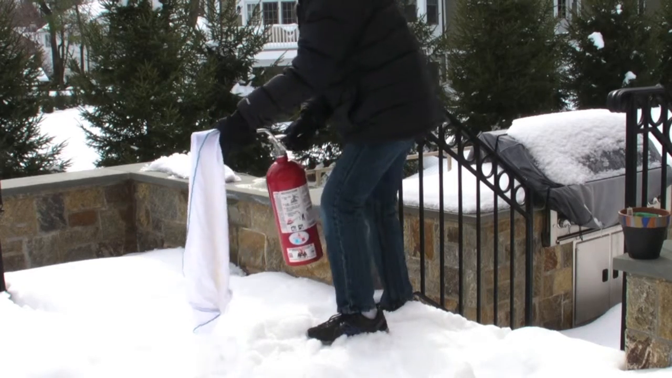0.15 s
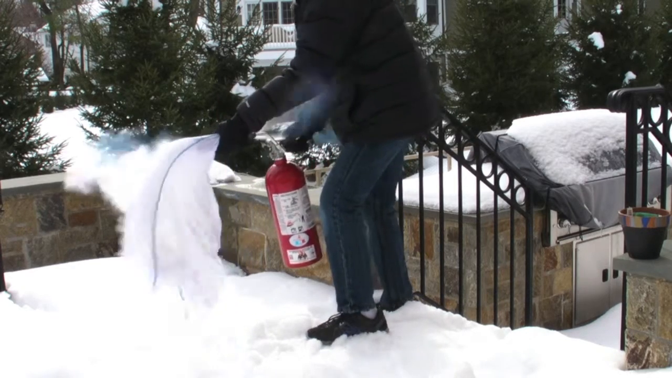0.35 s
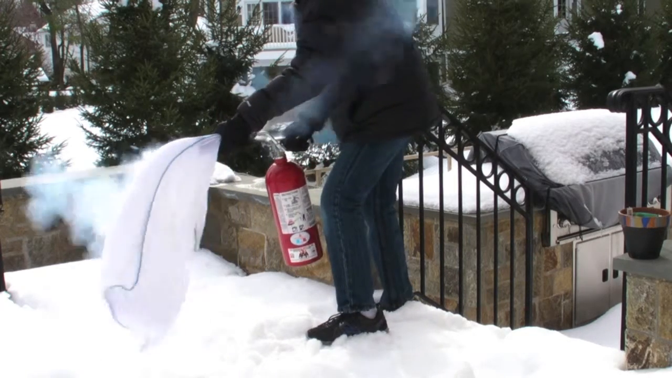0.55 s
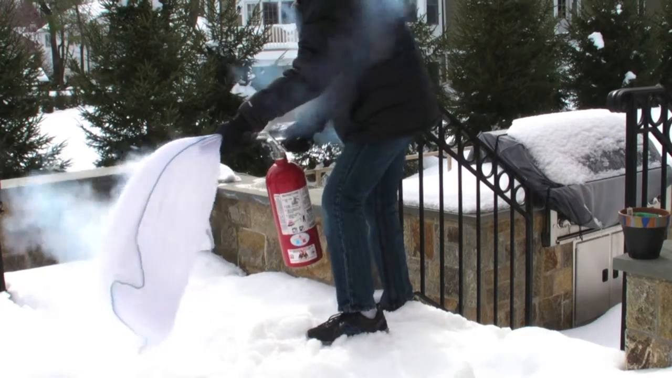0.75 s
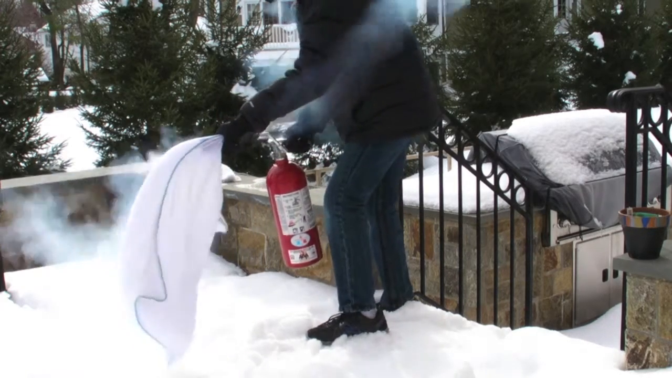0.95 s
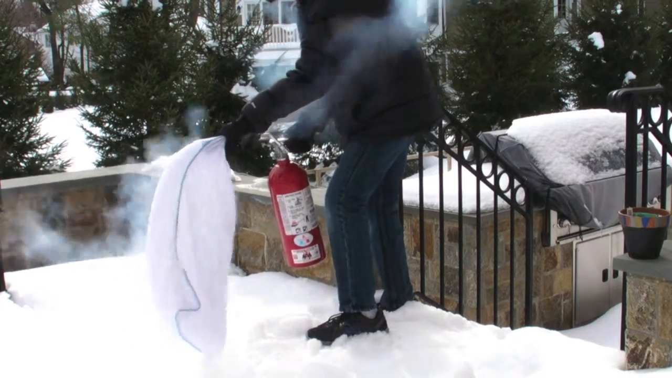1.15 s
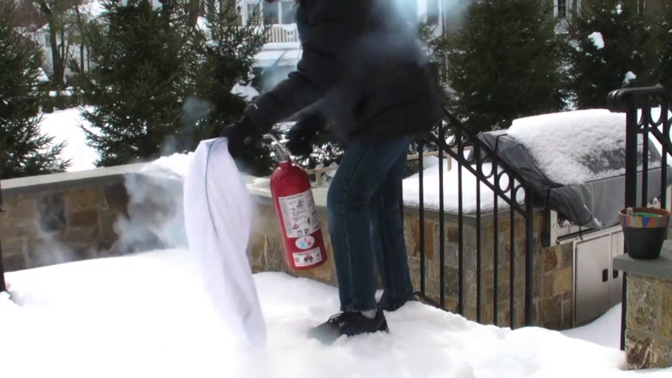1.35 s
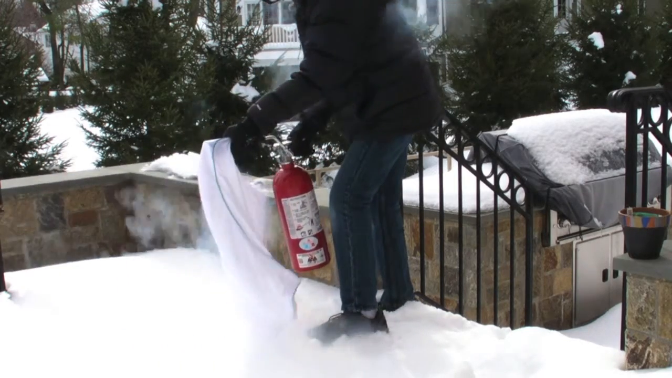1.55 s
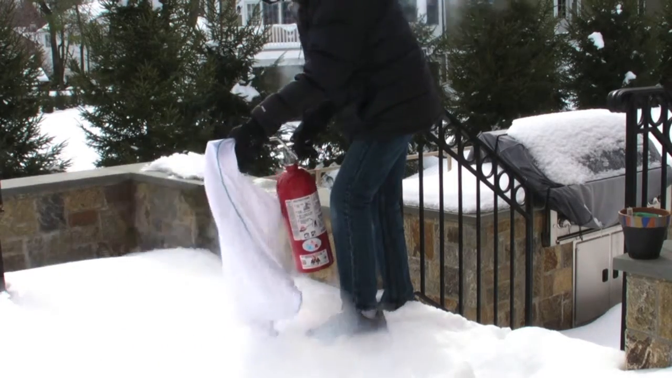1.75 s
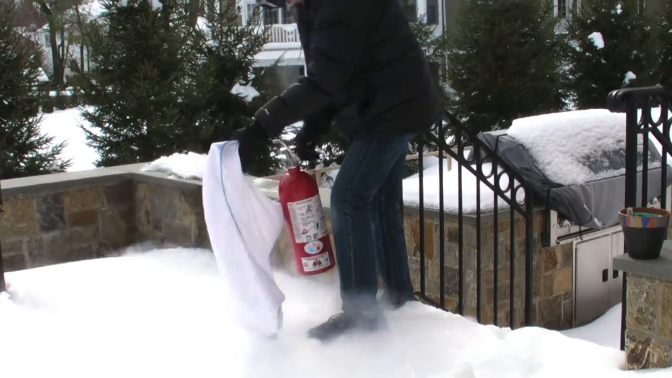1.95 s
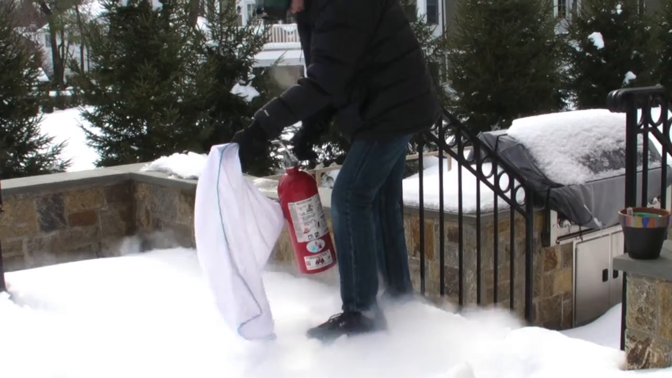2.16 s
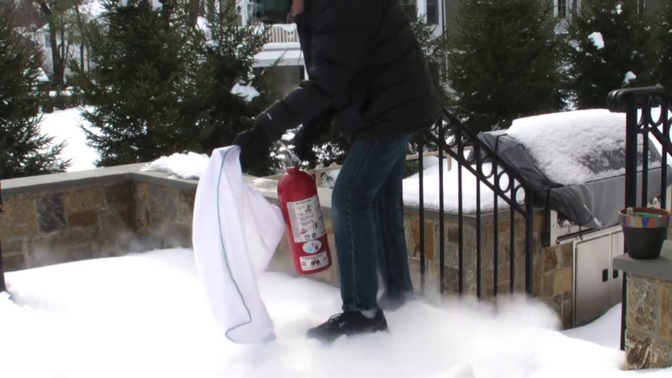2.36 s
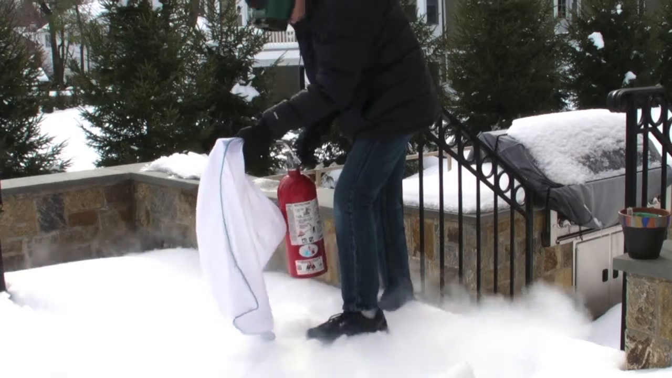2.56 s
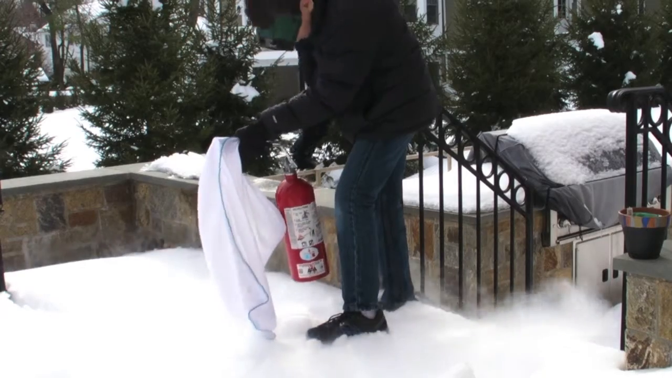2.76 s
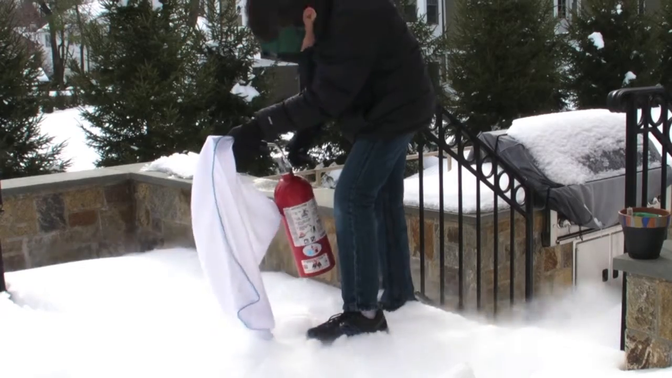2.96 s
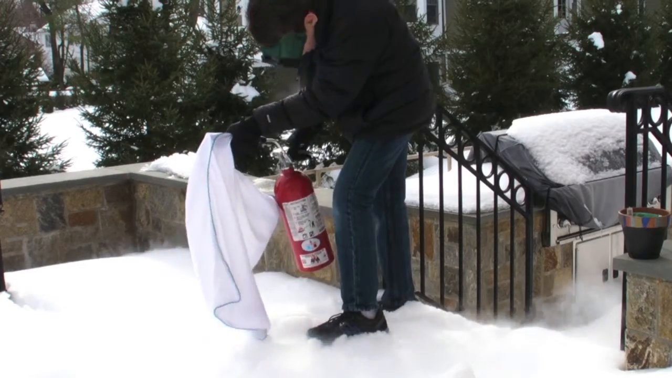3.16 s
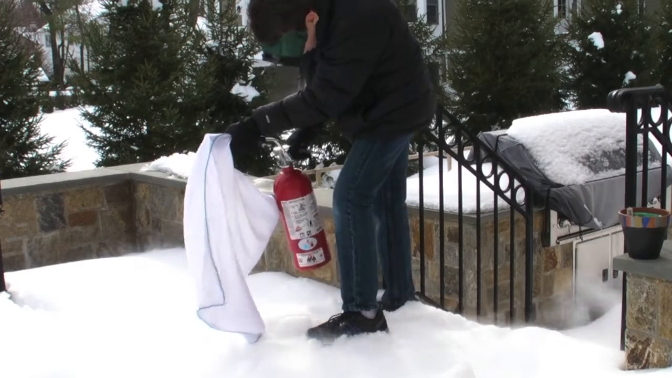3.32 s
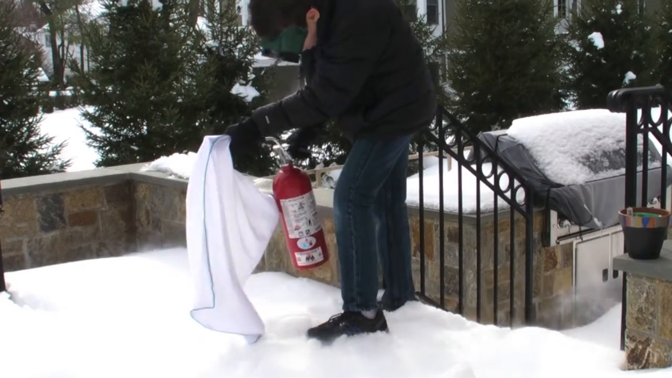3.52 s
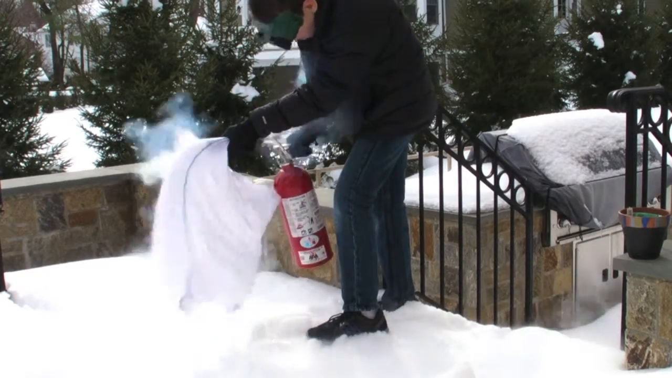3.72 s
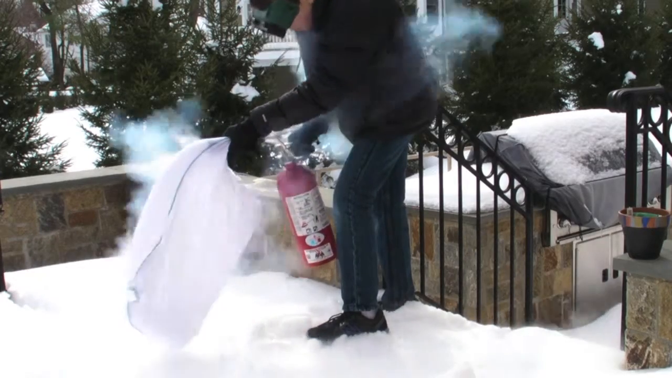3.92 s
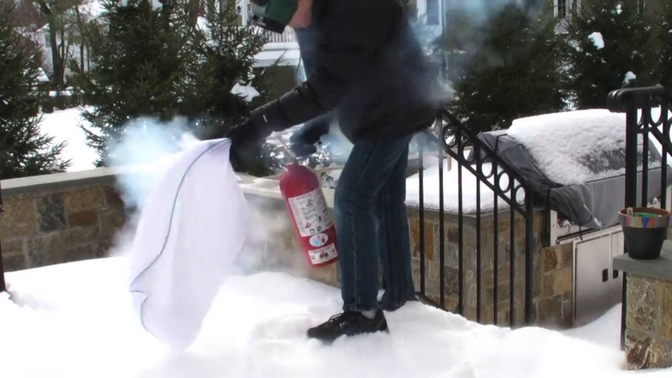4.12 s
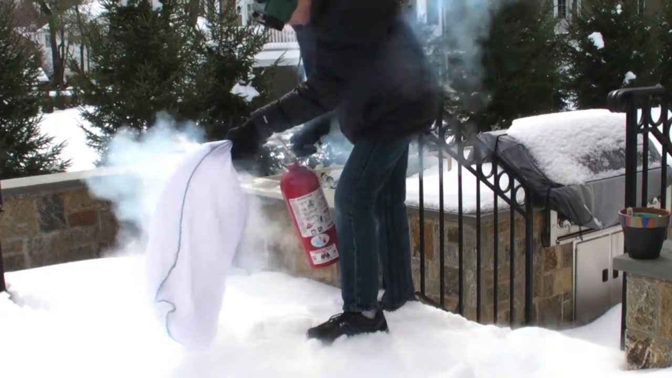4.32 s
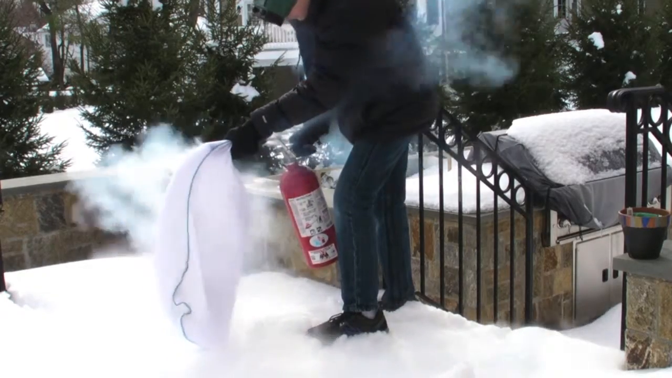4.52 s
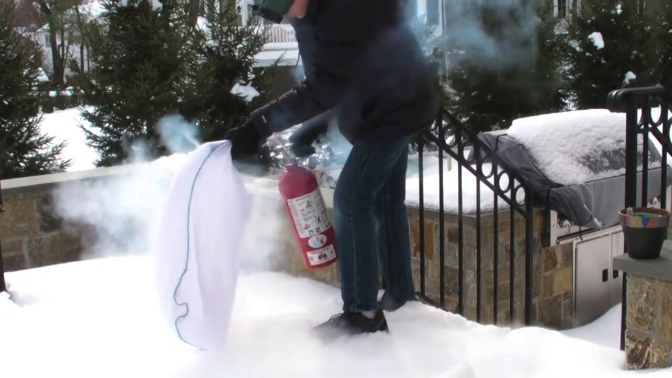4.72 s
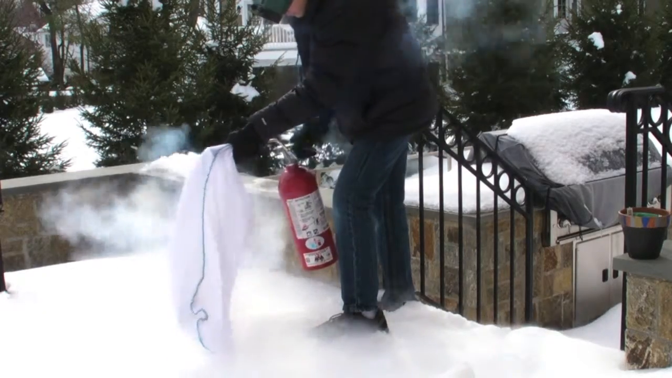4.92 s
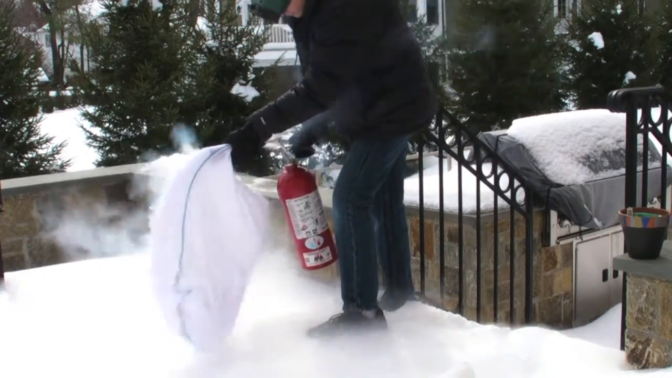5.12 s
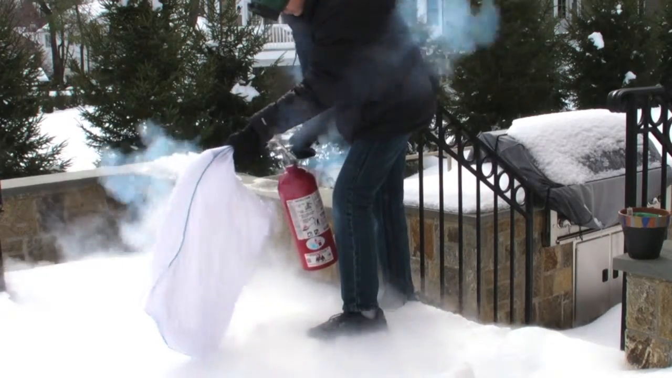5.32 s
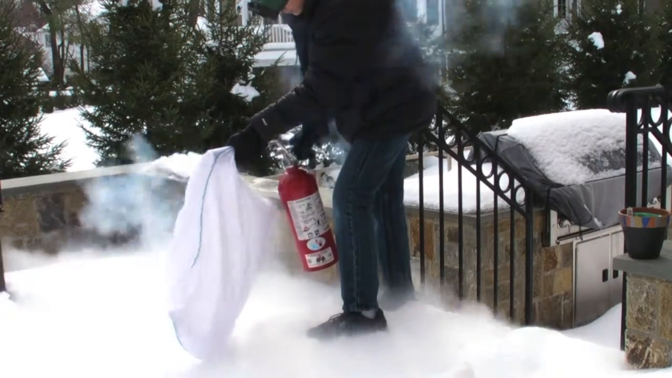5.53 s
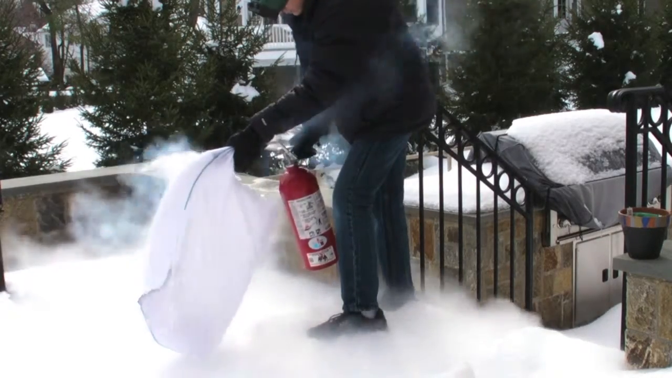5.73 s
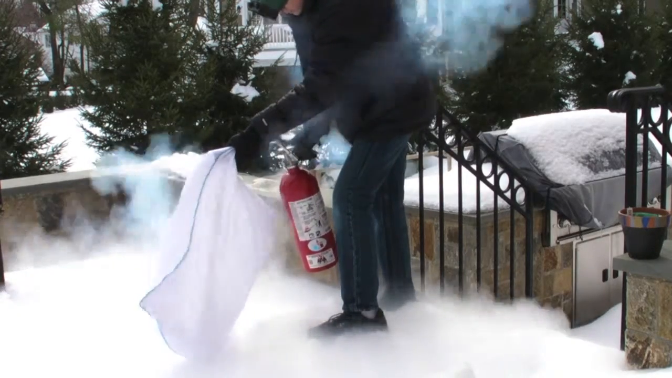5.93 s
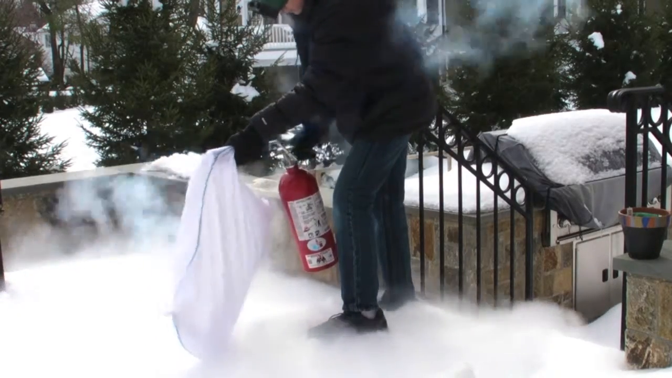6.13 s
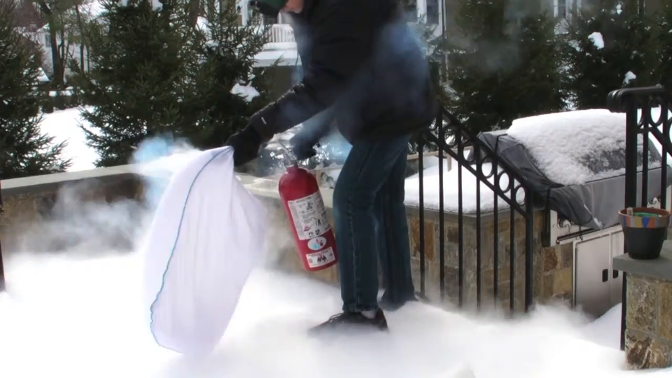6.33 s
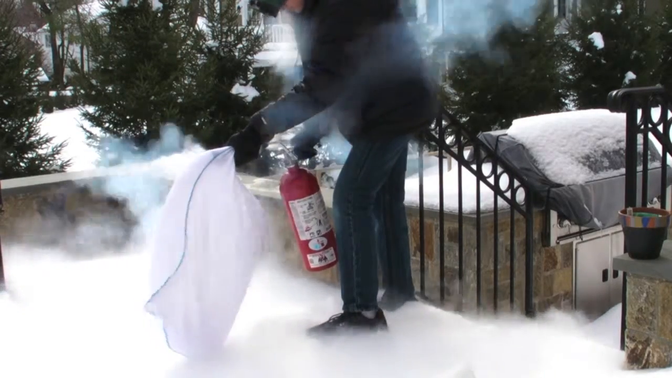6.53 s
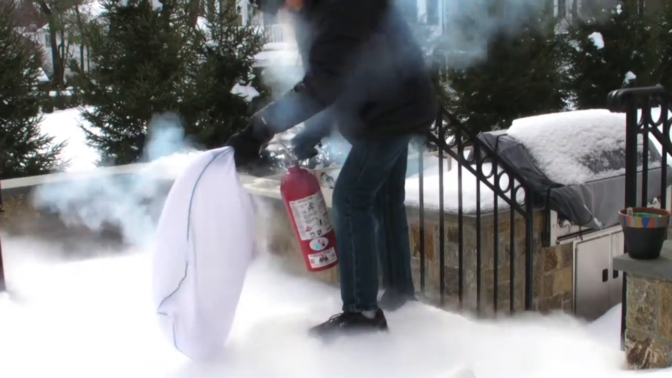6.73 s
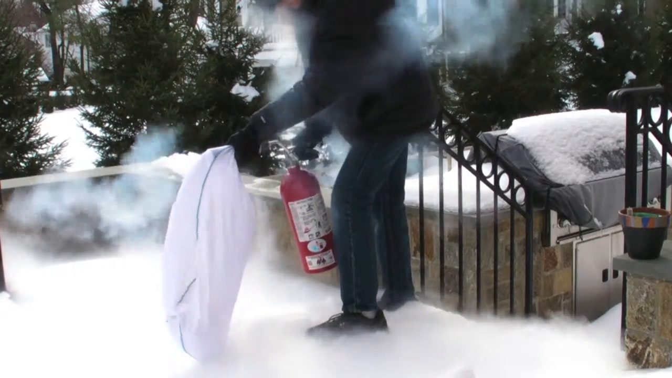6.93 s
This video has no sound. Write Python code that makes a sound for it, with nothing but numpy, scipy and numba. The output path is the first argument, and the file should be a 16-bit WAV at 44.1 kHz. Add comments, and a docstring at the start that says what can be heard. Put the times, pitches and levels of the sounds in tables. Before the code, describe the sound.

A quiet outdoor patio opens with faint, low town rumble and a trace of fizz. At about 0.26 s an extinguisher valve spits bright gas, and almost at once a loud, hollow roar with low boom and sharp hiss surges into a cloth bag, strongest at first, swaying and fluttering until 1.3 s. The roar dies just before the hiss; the horn fizzes and hums hollowly, and the bag sighs softly around 1.4 to 1.6 s. Until 3.6 s only faint dry-ice fizz, small dry ticks near 1.7, 2.3 and 3.1 s, and rumble remain. A second long blast runs 3.7 to 4.9 s, then short ones at 5.1 to 5.5 and 5.65 to 6.0 s, and a fifth from 6.2 to just under 7 s, ending in fading fizz. Stone walls give close hollow reflections, houses a dull wash; the close stereo microphones duck under each blast.

```python
"""A snowy, stone-walled patio: a CO2 extinguisher is fired five times into a cloth bag, over a distant town rumble.
Each squeeze spits gas, then liquid flashes in the horn and roars; on release the roar dies before the hiss.
The horn fizzes and hums on, dry ice fizzes and ticks, and the bag sighs; all are filtered noise under envelopes.
Walls and houses echo; an automatic gain control ducks under each blast."""
import sys
import numpy as np
from scipy import signal
from scipy.fft import rfft, irfft
from scipy.io import wavfile
from scipy.ndimage import uniform_filter1d
from numba import njit

SR = 44100
rng = np.random.default_rng(int(sys.argv[2]) if len(sys.argv) > 2 else 0)


def log_audio(samples):
    """Write samples as a 16-bit WAV file to the path given in sys.argv[1]."""
    # one column per channel
    frames = np.atleast_2d(samples).T
    # limit to full scale, then quantise
    limited = np.clip(frames, -1, 1)
    pcm = np.round(limited * 32767).astype(np.int16)
    wavfile.write(sys.argv[1], SR, pcm)


N = 312088
T = np.arange(N) / SR  # time in seconds
HZ = np.maximum(np.fft.rfftfreq(N, 1 / SR), 1)  # spectrum frequencies, kept above zero for the logarithms


def undb(db):
    """Decibels to gain."""
    return 10 ** (np.asarray(db) / 20)


def colour(points):
    """Gain at every frequency from (Hz, dB) points, joined by straight lines over log frequency."""
    hz, db = np.transpose(points)
    return undb(np.interp(np.log(HZ), np.log(hz), db))


def resonances(modes):
    """Gain of overlapping resonances with steep skirts, their powers added."""
    power = 0
    for hz, width_hz, db in modes:
        detuning = (HZ - hz) / width_hz * np.sqrt(2)
        power = power + undb(2 * db) / (1 + detuning ** 2) ** 2
    return np.sqrt(power)


def noise(gain):
    """Noise of rms 1 with the given spectrum."""
    x = irfft(rfft(rng.standard_normal(N)) * gain, N)
    return x / x.std()


def walk(rate_hz):
    """Smooth random wander of spread 1 that changes about rate_hz times a second."""
    return noise(1 / (1 + (HZ / rate_hz) ** 4))


def gate(start, stop, rise_s, fall_s):
    """Pressure builds smoothly from start and drains exponentially after stop."""
    build = 1 - np.exp(-(np.maximum(T - start, 0) / rise_s) ** 2)
    drain = np.exp(-np.maximum(T - stop, 0) / fall_s)
    return build * drain


def spells(rows, rise_s, fall_s):
    """Envelope of (start, length, dB) events that share one rise and one fall."""
    return sum(undb(db) * gate(start, start + length_s, rise_s, fall_s) for start, length_s, db in rows)


def tail(delay_s, t60):
    """Response of dense, dying reflections of unit energy, different on each side."""
    response = rng.standard_normal((2, N)) * gate(delay_s, delay_s, delay_s, t60 / np.log(1000))
    return response / np.sqrt(np.sum(response ** 2, axis=1, keepdims=True))


# Rumble of the distant town. Each row: frequency in Hz, density in dB per Hz.
TOWN_COLOUR = [(20, -6), (60, -2), (95, -1.5), (200, -13.5), (320, -16.5), (480, -23.5), (750, -23.5),
               (1300, -30), (3500, -37), (6000, -39), (9000, -39.5), (15000, -44)]


def town(level_db=-39.0, wide_hz=900, low_cut_hz=34):
    """Steady distant rumble, alike on both sides in the bass and diffuse higher up."""
    shape = colour(TOWN_COLOUR) / np.hypot(1, (low_cut_hz / HZ) ** 2)
    width = np.hypot(.12, HZ / (HZ + wide_hz))
    side_level = np.linalg.norm(shape * width) / np.linalg.norm(shape)
    side = noise(shape * width) * side_level
    return undb(level_db) * (noise(shape) + np.outer([1, -1], side))


# Echo off the nearest stone wall, left then right. Each row: delay in ms, gain.
WALL_ECHO = [(3.14, 0.29), (3.0, 0.48)]
# Scatter from the patio against the direct sound. Each row: frequency in Hz, gain in dB.
PATIO_SCATTER = [(150, -10), (400, -11), (750, -7.5), (1200, -2), (2500, -0.5), (5200, 8), (8300, 0.5),
                 (9600, 0), (11000, 15)]


def on_patio(gain, stone_db=-10, stone_t60=0.099, stone_hz=2600):
    """Stereo noise of a source on the patio: direct sound, a hollow wall echo, weak later bounces, diffuse scatter."""
    near = np.array([1 + echo * np.exp(-2j * np.pi * HZ * ms / 1000) for ms, echo in WALL_ECHO])
    # the later bounces are dull, and the same on both sides
    bounces = undb(stone_db) * rfft(tail(0.0032, stone_t60)[0]) / np.hypot(1, HZ / stone_hz)
    scatter = colour(PATIO_SCATTER)
    white = rfft(rng.standard_normal((3, N)))  # one shared by both sides, then one for each
    mix = (near + bounces) * white[0] + scatter * white[1:]
    x = irfft(gain * mix / np.hypot(1, scatter), N)
    return x / x.std()


# Fizz of the cold horn and dry ice. Each row: frequency in Hz, density in dB per Hz.
FIZZ_COLOUR = [(800, -28), (1700, -10), (3500, -11.5), (5500, -12), (7300, -10.5), (9200, -5), (11000, -13),
               (15000, -22)]
# Spells of dry ice fizzing; the last one trails a tick. Each row: start in seconds, length in seconds, level in
# dB.
FIZZES = [(0, .11, -49.5), (1.8, .25, -49), (2.245, .2, -46.5), (2.55, .38, -53), (3.09, .07, -50)]
FIZZ_RISE_S, FIZZ_FALL_S = .02, .06
# The cold horn fizzes on after the valve shuts, then dies away.
AFTER_FIZZ_HOLD_S, AFTER_FIZZ_FALL_S = .19, .065
# Hollow notes of the emptying horn. Each row: frequency in Hz, width in Hz, level in dB.
HORN_MODES = [(350, 35, 0), (705, 90, -4)]
HORN_RISE_S = .13  # the hollow notes swell as the hiss dies
# Dry ice and cloth crackling. Each row: start in seconds, level in dB ahead of the tick_db trim.
TICKS = [(1.6721, -28.5), (2.2516, -26), (2.2613, -22.5), (2.3291, -32), (2.4813, -32), (3.0954, -27.5),
         (3.1223, -28.5), (3.2565, -37)]
# Colour of one crackle. Each row: frequency in Hz, density in dB per Hz.
TICK_COLOUR = [(1000, -32), (2500, -18), (3700, -6), (5500, -7), (8000, 2), (10000, 0), (14000, -14),
               (15500, -15.5)]
TICK_T60_S = .072


def dry_ice(fizz_db=0, grain_db=2, tick_db=-6, simmer_db=-65, horn_db=-7):
    """After each blast the emptying horn fizzes and hums; dry ice fizzes in spells and crackles in the bag."""
    after = [(opens + held_s, AFTER_FIZZ_HOLD_S, left_db) for opens, _, _, _, held_s, _, _, _, left_db in BLASTS]
    horn_fizz = spells(after, FIZZ_RISE_S, AFTER_FIZZ_FALL_S)
    boiling = horn_fizz + spells(FIZZES, FIZZ_RISE_S, FIZZ_FALL_S) + undb(simmer_db)
    fizz = boiling * undb(fizz_db + grain_db * walk(250)) * on_patio(colour(FIZZ_COLOUR))
    ticks = sum(undb(db + tick_db) * gate(s, s, 0.00043, TICK_T60_S / np.log(1000)) for s, db in TICKS)
    hum = spells(after, HORN_RISE_S, AFTER_FIZZ_FALL_S) * undb(horn_db)
    return fizz + ticks * on_patio(colour(TICK_COLOUR)) + hum * on_patio(resonances(HORN_MODES))


def houses(x, delay_s=0.074, t60=1.0):
    """A late, dull wash of echoes from the houses around."""
    far = irfft(rfft(x) * colour(HOUSE_ECHO), N)
    return signal.fftconvolve(far, tail(delay_s, t60), axes=1)[:, :N]


# Echo from the houses against the direct sound. Each row: frequency in Hz, gain in dB.
HOUSE_ECHO = [(100, -31), (300, -27), (700, -24), (1000, -29), (1600, -30.5), (4000, -31), (12000, -32)]

# The flow overshoots as the bag fills, then swings and settles; a fresh blast is stronger until the horn chills.
BILLOW_PEAK_S, BILLOW_PERIOD_S, BILLOW_SETTLE_S = .108, .375, .55
FRESH_BOOST, CHILL_S = 1.0, .22  # boost counted in swings


def billow(start):
    """Flow above its steady value after liquid first reaches the bag: a damped swing on a fading boost."""
    age = np.maximum(T - start, 0)
    past_crest = age - BILLOW_PEAK_S
    swing = np.cos(2 * np.pi * past_crest / BILLOW_PERIOD_S) * np.exp(-past_crest / BILLOW_SETTLE_S)
    return swing + FRESH_BOOST * np.exp(-age / CHILL_S)


# Squeezes of the lever. Each row: valve opens in seconds, valve travel in seconds, liquid lag in seconds,
# liquid lasts in seconds, valve held in seconds, spit in dB, and ahead of the layer trims roar in dB
# and boom in dB, then fizz left behind in dB.
BLASTS = [(.257, .012, .048, 1.010, 1.081, -2, -.9, -1.8, -37.5),
          (3.686, .018, .032, 1.120, 1.182, -2.5, -.6, -1.6, -38),
          (5.091, .017, .029, .305, .370, -1.5, .7, 1, -38),
          (5.651, .016, .028, .298, .364, -.5, .2, 1.4, -50),
          (6.205, .016, .024, .692, .764, -2, -.1, -.8, -52)]
# Gas jet at full flow. Each row: frequency in Hz, density in dB per Hz.
HISS_COLOUR = [(150.0, -37), (400.0, -13), (1000.0, -12.5), (2000.0, -9.5), (3700.0, -8), (5500.0, -8.0),
               (7000.0, -9.5), (8100.0, -3.5), (9000.0, 0.0), (9900.0, -3.9), (11000.0, -9.5),
               (13500.0, -13.5), (15000.0, -25.5)]
# Gas jet as the valve cracks open. Each row: frequency in Hz, density in dB per Hz.
SPIT_COLOUR = [(150, -25), (330, -12.5), (1050, -9), (1450, 1), (1900, -17), (2300, -8), (3100, -7),
               (3750, -6), (5000, -17.5), (7200, -4.5), (8900, 1), (13500, -17.5), (15500, -29)]
# Low resonances of the horn and bag. Each row: frequency in Hz, width in Hz, level in dB.
BOOM_MODES = [(102, 42, -18), (257, 58, 0), (350, 44, -4.5), (449, 59, -3.5)]
# Higher resonances of the horn and bag. Each row: frequency in Hz, width in Hz, level in dB.
ROAR_MODES = [(562, 25, -7), (711.6, 124, 0), (960, 180, -2.5), (1182, 21, -2), (1414, 217, -3.5),
              (1646, 160, -6), (2018, 78, -8.5), (2323, 380, -10), (2994, 350, -12), (3730, 220, -15)]
JET_LAG_S = .002  # the hiss needs a moment to build once the valve cracks open


def extinguisher(roar_db=-4.5, boom_db=-14, hiss_db=-5.1, flutter_db=0.97, throb_db=1.3, grit_db=0.87,
                 roar_billow_db=.75, boom_billow_db=1.3, hiss_billow_db=.65):
    """Gas hisses while the valve is open; the horn only roars and booms while liquid flashes in it."""
    gas = liquid = surge = spit = 0
    for opens, travel_s, lag_s, liquid_s, held_s, spit_db, liquid_db, surge_db, _ in BLASTS:
        arrives = opens + lag_s
        ends = arrives + liquid_s
        swing = billow(arrives)
        gas_gate = gate(opens + JET_LAG_S, opens + held_s, rise_s=travel_s, fall_s=0.023)
        gas = gas + undb(hiss_billow_db * swing) * gas_gate
        liquid_gate = gate(arrives, ends, rise_s=0.0097, fall_s=0.026)
        liquid = liquid + undb(liquid_db + roar_billow_db * swing) * liquid_gate
        surge_gate = gate(arrives, ends - .02, rise_s=0.014, fall_s=0.037)
        surge = surge + undb(surge_db + boom_billow_db * swing) * surge_gate
        # dry gas ahead of the liquid leaves with a brighter spit
        spit = spit + undb(spit_db) * gate(opens, arrives - .006, rise_s=travel_s, fall_s=0.0087)
    # the two-phase jet is unsteady: the roar flutters, and grains of dry ice roughen the hiss
    roar = liquid * undb(roar_db + flutter_db * walk(43)) * on_patio(resonances(ROAR_MODES))
    boom = surge * undb(boom_db + throb_db * walk(16)) * on_patio(resonances(BOOM_MODES))
    hiss = gas * undb(hiss_db + grit_db * walk(300)) * on_patio(colour(HISS_COLOUR))
    return roar + boom + hiss + spit * on_patio(colour(SPIT_COLOUR))


# Puffs from the swollen bag as it collapses. Each row: start in seconds, length in seconds, level in dB.
PUFFS = [(1.39, .16, -34.5), (1.87, .19, -48.5)]
PUFF_RISE_S, PUFF_FALL_S = .07, .085
# Gas sighing through the cloth. Each row: frequency in Hz, density in dB per Hz.
SIGH_COLOUR = [(150, -12), (300, -4.5), (650, -4), (1200, -8.5), (2100, -8), (3300, -20), (7000, -27),
               (14000, -45)]


def bag(sigh_db=0, flap_db=2.0):
    """Gas escapes through the cloth in uneven puffs."""
    puffs = spells(PUFFS, PUFF_RISE_S, PUFF_FALL_S)
    return puffs * undb(sigh_db + flap_db * walk(20)) * on_patio(colour(SIGH_COLOUR))


def scene():
    """The extinguisher, its dry ice and the bag on the patio, their echo, and the town."""
    near = extinguisher() + dry_ice() + bag()
    return near + houses(near) + town()


@njit
def follow(x, attack, release):
    """Follower that rises and falls at different speeds, each the share of the gap closed per sample."""
    y, level = np.empty(len(x)), 0.
    for i in range(len(x)):
        level += (x[i] - level) * (attack if x[i] > level else release)
        y[i] = level
    return y


# Left against right microphone. Each row: frequency in Hz, gain in dB, phase lead in radians.
MICROPHONES = [(60, -1.3, 0), (180, 2.5, 0.038), (400, 0.7, 0.15), (754, 2.5, -0.26), (1200, 0.5, -0.029),
               (2500, 2, 0.19), (5230, -.5, 0.77), (8300, 1.9, 0.26), (9600, -.6, 0.17),
               (11000, -3.5, 0.42), (13500, -3, .5)]
TOP_HZ = 15300


def record(dry, threshold_db=-12.5, ratio=9, attack_s=0.012, release_s=0.17):
    """Two unequal microphones, gain control that ducks quickly and recovers slowly, overload and a top cut."""
    hz, _, lead = np.transpose(MICROPHONES)
    left_over_right = colour(np.array(MICROPHONES)[:, :2]) * np.exp(1j * np.interp(HZ, hz, lead))
    # each side takes half of the difference
    x = irfft(rfft(dry) * left_over_right ** np.array([[.5], [-.5]]), N)
    power = uniform_filter1d(np.mean(x ** 2, axis=0), size=220)  # averaged over 5 ms
    over_db = np.maximum(10 * np.log10(np.abs(power) + 1e-12) - threshold_db, 0)
    duck_db = follow(over_db * (1 - 1 / ratio), 1 / (attack_s * SR), 1 / (release_s * SR))
    overloaded = np.clip(x * undb(-duck_db), -1, 1)
    top_cut = signal.ellip(10, .2, 90, TOP_HZ, fs=SR, output="sos")
    return signal.sosfilt(top_cut, overloaded)


dry = scene()
out = record(dry)
log_audio(out)
```